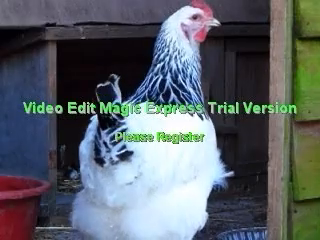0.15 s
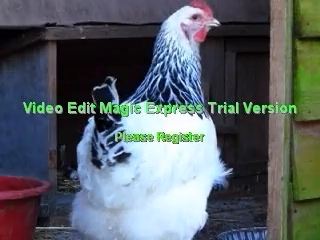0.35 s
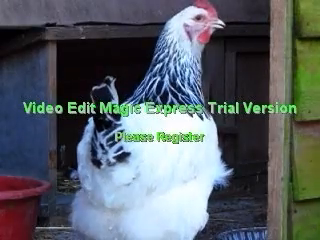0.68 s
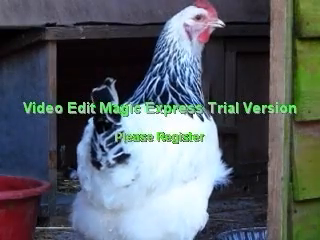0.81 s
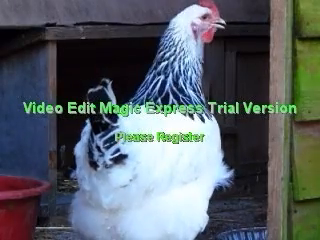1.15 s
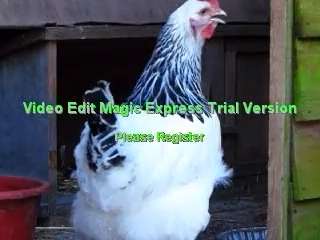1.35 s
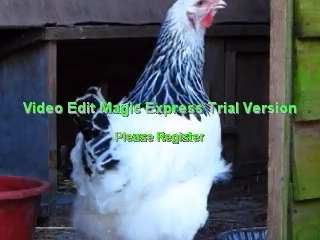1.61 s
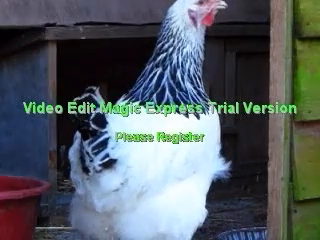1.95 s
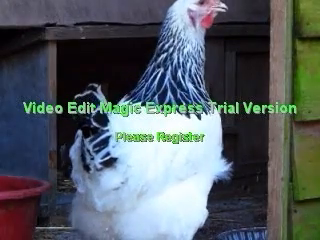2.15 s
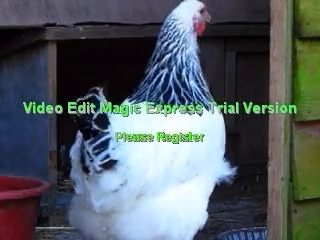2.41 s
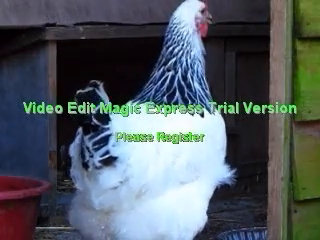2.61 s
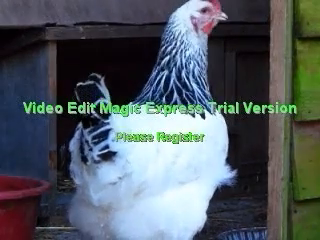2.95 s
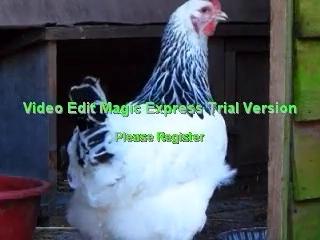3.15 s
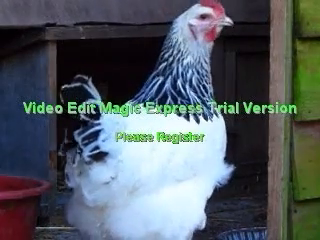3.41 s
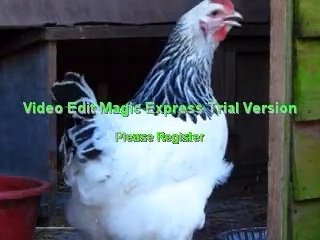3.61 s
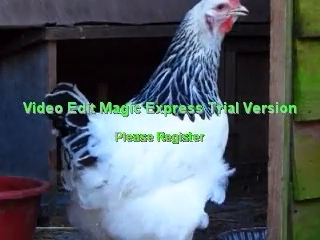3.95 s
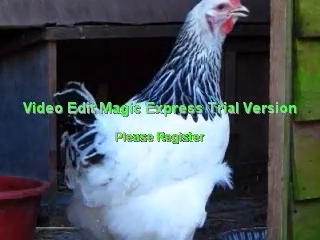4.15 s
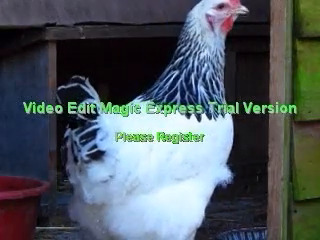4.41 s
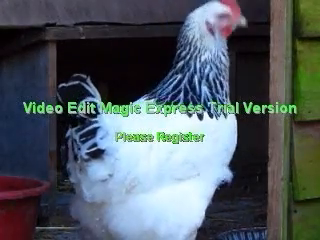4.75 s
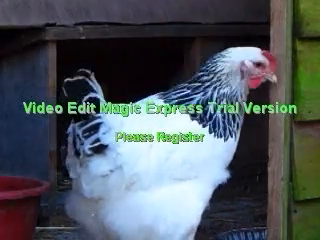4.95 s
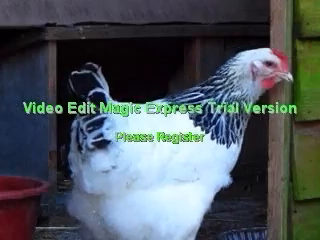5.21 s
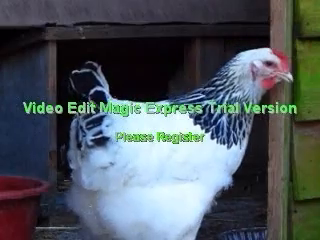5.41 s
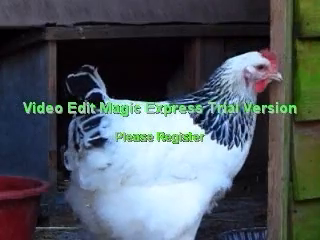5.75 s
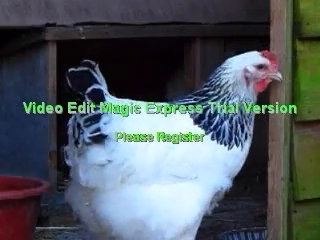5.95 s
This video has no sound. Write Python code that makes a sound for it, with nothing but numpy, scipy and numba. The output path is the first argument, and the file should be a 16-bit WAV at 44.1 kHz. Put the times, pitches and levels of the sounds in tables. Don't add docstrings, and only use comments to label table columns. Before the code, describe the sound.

One hen about a metre away beside a wooden coop gives short, hoarse clucks, four or five a second, growing louder until a long, bright, nasal squawk. After a brief gap she starts softly again, builds to a second squawk that turns rough at its end, then begins a third run. Faint board reflections, wind bumps and low garden hum surround her; the small cheap microphone sounds coarse, narrow and hissy.

```python
import sys
import numpy as np
from scipy import signal
from scipy.io import wavfile
from scipy.ndimage import uniform_filter1d, minimum_filter1d
from numba import njit

SR = 44100
rng = np.random.default_rng(int(sys.argv[2]) if len(sys.argv) > 2 else 0)


def master(y):
    cut = np.clip(np.atleast_2d(y).T, -1, 1)
    pcm = np.round(cut * 32767)
    wavfile.write(sys.argv[1], SR, pcm.astype(np.int16))


def amplitude_ratio(level_db):
    exponent = np.asarray(level_db, float) / 20
    return 10 ** exponent


N = 267687


def level(x, db):
    return x * amplitude_ratio(db) / np.sqrt(np.mean(x ** 2))


@njit
def svf(x, hz, width):
    y, band, low = np.empty(len(x)), 0., 0.
    for i in range(len(x)):
        g, k = np.tan(np.pi * hz[i] / SR), width / hz[i]
        v = (band + g * (x[i] - low)) / (1 + g * (g + k))
        band, low, y[i] = 2 * v - band, low + 2 * g * v, k * v
    return y


def ring(x, hz, width_hz):
    hz = hz * np.ones(N)
    for _ in range(3):
        x = svf(x, hz, 1. * width_hz)
    return x


def walk(rate):
    k = int(SR / rate)
    held = np.repeat(rng.standard_normal(N // k + 1), k)
    return 1.3 * uniform_filter1d(uniform_filter1d(held, k), k)[:N]


# f/Hz, spectral level/dB per Hz
HUM_SPECTRUM = [(24, -31), (40, -3.5), (70, -28), (145, -18.5), (560, -31), (693, -15.5), (793, -26),
                (1260, -28), (1410, -36), (1560, -21.5), (1890, -35.5), (3430, -23.5), (4000, -26.5),
                (5200, -58), (8800, -120)]
# t/s, level/dB
BREEZE_LEVEL = [(0, -48.5), (1.06, -43), (1.3, -49.5), (1.45, -59.5), (2.1, -50), (3.03, -47), (3.5, -42.5),
                (3.9, -50.5), (4.5, -56), (5.07, -52.5), (5.4, -44.5), (6.07, -45.5)]


def garden():
    hum, swell = 0, walk(0.31)
    hzs, dbs = np.transpose(HUM_SPECTRUM)
    for hz in 50 * 2 ** np.arange(0, 6.5, .5):
        density_db = np.interp(np.log(hz), np.log(hzs), dbs)
        db = density_db + 10 * np.log10(hz) + 1.7 * swell + 0.5 * walk(6.7)
        hum = hum + amplitude_ratio(db) * level(svf(rng.standard_normal(N), hz * np.ones(N), hz / 3), 0)
    breeze_db = np.interp(np.arange(N) / SR, *np.transpose(BREEZE_LEVEL)) + 1.8 * walk(25)
    breeze = level(ring(rng.standard_normal(N), 210, 360), 0)
    return level(hum, -51) + amplitude_ratio(breeze_db - 2) * breeze


def controls(calls, size):
    t = np.arange(N) / SR
    s, *columns = np.transpose(sorted(row for call in calls for row in call))
    gate = sum((t >= call[0][0]) & (t <= call[-1][0]) for call in calls) > 0
    return [np.interp(t, s, c) for c in columns], uniform_filter1d(1. * gate, size=size)


@njit
def beat(hz, rough, weak, chance, jitter, shimmer):
    pulses, p, k = np.zeros(len(hz) + 1), 0., 0
    for i in range(len(hz)):
        step = hz[i] * (1 + jitter * rough[i] * chance[k, 0]) / SR
        p += step
        if p >= 1:
            p, k = p - 1, k + 1
            size = (1 - weak[i] * (k % 2)) * np.exp(shimmer * rough[i] * chance[k, 1])
            pulses[i] += size * p / step
            pulses[i + 1] += size * (1 - p / step)
    return pulses[:-1]


def even(x):
    return x / np.sqrt(uniform_filter1d(x ** 2, size=700) + 1e-9)


def cluck_shape(s, db, hold_s, hz, chest_db):
    end, haste = s + hold_s, 1.2 - 9 * hold_s
    chesty_db = chest_db + 5
    lead_bright_db, rise = -6, 0.94
    tail_bright_db, sag = 4, .95
    return [(s - .025 * haste, db - 20.5, hz, chesty_db, lead_bright_db, rise),
            (s - .013 * haste, db - 15, hz, chesty_db, lead_bright_db, rise),
            (s, db, hz, chest_db, 0, 1),
            (end, db + 1.5, hz, chest_db, 0, 1),
            (end + .012, db - 8.5, hz, chest_db + 2.5, tail_bright_db / 2, 1),
            (end + .062, db - 30, hz, chesty_db, tail_bright_db, sag)]


# full voice from t/s, level/dB, hold/s, f/Hz, chest level/dB
CLUCK_EVENTS = [(.164, -22.5, 0.019, 313.7, -3), (0.447, -19.5, 0.023, 358.4, -5.5),
                (0.686, -15, .025, 360.5, -7), (.901, -12, 0.023, 363.2, -5),
                (1.112, -13, 0.024, 368.6, -5), (1.633, -27.5, 0.053, 411.8, -1),
                (1.874, -21.5, 0.019, 357.4, -7), (2.142, -21, .01, 337.7, -5.5),
                (2.386, -16.5, .01, 355.6, -15), (2.629, -15.5, 0.016, 356.5, -10),
                (2.851, -14, .023, 353.9, -8), (3.067, -13.5, .028, 361.3, -8.5),
                (3.277, -15.5, 0.039, 360.2, -6.5), (3.489, -16, .033, 361.2, -8),
                (4.097, -26, .036, 384.8, -6.5), (4.493, -22, 0.017, 334.7, -9),
                (4.767, -24.5, 0.023, 317.9, -12.5), (5.074, -16, 0.019, 342.4, -13.5),
                (5.305, -18, .031, 337.4, -4), (5.542, -15, 0.018, 339.8, -8),
                (5.795, -14.5, 0.021, 365.7, -14), (6.026, -14.5, 0.031, 375.2, -9)]
VOICE_QUALITY = [(0, .55, .55), (.6, .7, .3), (1.2, .4, .75), (1.6, .5, .45), (2.1, .3, .3), (2.3, .5, .4),
                 (3.0, .65, .35), (3.58, .4, .75), (4.05, .45, .5), (4.4, .25, .3), (5.25, .5, .45)]
# t/s, f/Hz, brightness/dB, throat tuning ratio
BEAK_GAPE = [(.17, 3366, 1, 0.98), (.9, 3287, 0.5, 1.008), (1.13, 3226, 3, .99), (1.66, 3500, 0.5, 1.018),
             (2.15, 3557, -1.5, .99), (2.4, 3354, -3, 0.98), (2.86, 3167, -1.5, 1.01), (3.3, 3288, 1, 1),
             (3.5, 3130, 4, 0.98), (3.88, 3650, -1, 1.017), (4.12, 3560, -1.5, 0.99),
             (4.5, 3145, -3.5, 0.99), (4.78, 3566, -4.5, 1.07), (5.09, 3540, -1.5, 1.04),
             (5.32, 3442, 5, 1.013), (5.56, 3390, 1, 1.01), (5.81, 3530, -2.5, 1.05),
             (6.04, 3504, 0.5, 1.053)]
# f/Hz, width/Hz, level/dB
CHEST_MODES = [(304, 300, -10.5), (719.7, 160, -6), (903.6, 300, 10)]
THROAT_MODES = [(1027.8, 340, 5), (1372, 240, -16.5)]
BESIDE_BEAK_MODES = [(2789, 280, -9), (3960, 490, -11.5)]
# t/s from the edge, level/dB; then f/Hz, chest level/dB, brightness/dB
CRACK_IN, CRACK_IN_VOICE = [(-.013, -33.5), (-.007, -28.5), (.009, -31)], (400, -8, 17)
CRACK_OUT, CRACK_OUT_VOICE = [(.002, -36), (.017, -28), (.085, -50)], (367, -2.7, 16)


def clucks():
    calls = [cluck_shape(*row) for row in CLUCK_EVENTS]
    for call in SQUAWK_CALLS:
        for edge, shape, voice in ((call[0][0], CRACK_IN, CRACK_IN_VOICE), (call[-1][0], CRACK_OUT, CRACK_OUT_VOICE)):
            calls.append([(edge + s, db, *voice, 1) for s, db in shape])
    (db, pitch_hz, chest_db, air_db, arch), gate = controls(calls, size=300)
    (beak_hz, gape_db, tuning), _ = controls([BEAK_GAPE], size=1)
    middle_db = -18.5 + air_db + 0.77 * gape_db
    beak_db = -18.5 + air_db + gape_db

    s, *quality = np.transpose(VOICE_QUALITY)
    now = np.searchsorted(s, np.arange(N) / SR, side="right") - 1
    weak, rough = (q[now] for q in quality)
    chance = np.clip(rng.standard_normal((4000, 2)), -2, 2)
    pulses = level(beat(pitch_hz * arch, rough, weak, chance, .12, .7), 0)
    breath = rough * rng.standard_normal(N)

    low = pulses + 1.4 * breath
    high = pulses + 4. * breath
    shift = arch ** 1.5 * tuning
    chest = even(sum(amplitude_ratio(g) * ring(low, hz * shift, w) for hz, w, g in CHEST_MODES))
    throat = even(sum(amplitude_ratio(g) * ring(low, hz * shift, w) for hz, w, g in THROAT_MODES))
    middle = even(ring(pulses + 2.7 * breath, 1920, 330))
    beside = sum(amplitude_ratio(g) * ring(high, hz, w) for hz, w, g in BESIDE_BEAK_MODES)
    beak = even(ring(high, beak_hz, 380) + beside)

    body = np.sqrt(1 - np.minimum(amplitude_ratio(chest_db), .95) ** 2) * throat + amplitude_ratio(chest_db) * chest
    voice = body + amplitude_ratio(middle_db) * middle + amplitude_ratio(beak_db) * beak
    depth = 0.7 * (air_db < 8) * np.clip((3446 - beak_hz) / 120, 0, 1)
    dip = depth * svf(voice, 1499 * np.ones(N), 320.)
    return gate * amplitude_ratio(db) * (voice - dip)


@njit
def walls(x, lags, gain, damp):
    line, soft, out = np.zeros((8, 4096)), np.zeros(8), np.zeros(len(x))
    for i in range(len(x)):
        total = 0.
        for k in range(8):
            soft[k] += (1 - damp) * (gain[k] * line[k, (i - lags[k]) & 4095] - soft[k])
            total += soft[k]
        out[i] = soft[::2].sum() - soft[1::2].sum()
        for k in range(8):
            line[k, i & 4095] = x[i] + soft[k] - total / 4
    return out


def coop(hen):
    slap_s, slap_db, t60_s, damp, tail_db = .021, -15, .38, .12, -22
    lag = int(slap_s * SR)
    near = hen.copy()
    near[lag:] += amplitude_ratio(slap_db) * hen[:-lag]
    lags = np.array([613, 907, 1213, 1531, 1871, 2251, 2659, 3109])
    tail = walls(near + 1e-18, lags, amplitude_ratio(-60 * lags / SR / t60_s), damp)
    return near + amplitude_ratio(tail_db) * tail


# t/s, peak level/dB, f/Hz
WIND_POPS = [(0.672, -27, 306), (0.893, -25.5, 286), (0.955, -39.5, 225), (1.095, -25, 306),
             (3.077, -27, 175), (3.147, -44, 127), (3.27, -31.5, 115.7), (3.291, -19.5, 187.4),
             (3.315, -16, 156.4), (3.466, -36, 120), (3.601, -35, 253), (3.632, -40, 145.5),
             (3.688, -38, 111.3), (3.706, -27, 112), (3.861, -28.5, 130), (3.98, -29.5, 160.6),
             (4.005, -25.5, 193), (4.024, -26.5, 207.6), (4.183, -39, 132), (5.343, -30, 262),
             (5.771, -40.5, 191), (5.931, -27, 240.5)]


def pops():
    out, t = np.zeros(N + 2000), np.arange(2000) / SR
    for s, db, hz in WIND_POPS:
        i = int(s * SR)
        out[i:i + 2000] += amplitude_ratio(db) * np.sin(2 * np.pi * hz * t) * np.exp(-(t * hz / 1.3) ** 2)
    return out[:N]


# t/s, f/Hz, level/dB, brightness/dB, ring of fourth and seventh harmonic/dB
SQUAWK_CALLS = [
    [(1.228, 533.5, -11, -4, -2), (1.25, 528.3, -11.5, 0.5, -6.5), (1.29, 520.8, -12.5, 4, 0),
     (1.35, 529.8, -12, 2.5, -0.5), (1.375, 535.3, -12.5, -11.5, -13.5), (1.43, 538.8, -12, -10, -7),
     (1.457, 557, -14, -13.5, -9)],
    [(3.606, 526.4, -13.5, -2, -1.5), (3.626, 518.4, -11.5, -4.5, -7), (3.7, 517, -13, -1.5, -4),
     (3.74, 529.3, -14.5, -11, 0), (3.762, 531.9, -11, -11, 3), (3.79, 533.5, -10.5, -16.5, -9),
     (3.815, 544.3, -13.5, -26, -18), (3.84, 544.4, -16, -19.5, -7.5), (3.86, 552.3, -11, -20.5, -13.5)],
]
# t/s from the edge, pitch ratio, level/dB, brightness/dB
LOCKING_IN = [(-.013, 1.09, -30.5, 9), (-.0075, 1.33, -7, 4), (-.004, 1.015, -1.5, 5.5)]
# t/s from the edge, pitch ratio, level/dB, brightness/dB
BREAKING_OFF = [(.009, 0.96, -2, 4), (.018, .9, -1.6, -2), (.023, .87, -18.5, -7.5)]
# multiple of the pitch, level/dB
UPPER_PARTIALS = [(4, 4), (6, -4), (7, -14)]
BEAK_PARTIALS = [(5, -1.5)]
HALF_PARTIALS = [(.5, -14.5), (1.5, -17.5), (2.5, -5), (3.5, -1.5), (4.5, -10.5), (5.5, -17.5), (6.5, -8.5)]


def squawk_edge(row, shape):
    s, hz, db, bright_db, ring_db = row
    return [(s + ds, hz * ratio, db + rel_db, bright_db + air, ring_db + air) for ds, ratio, rel_db, air in shape]


def squawks():
    t = np.arange(N) / SR
    calls = [squawk_edge(c[0], LOCKING_IN) + c + squawk_edge(c[-1], BREAKING_OFF) for c in SQUAWK_CALLS]
    (hz, db, bright_db, ring_db), gate = controls(calls, size=60)
    upper_db, beak_db = -19 + ring_db, -17 + bright_db
    half_db = -37.5 + np.interp(t, (3.765, 3.805), (0, 20.5))
    low_db = db - 25
    for call, lag_s, start_db in zip(SQUAWK_CALLS, (0.018, .14), (-26, -14.5)):
        low_db = low_db + start_db * np.exp(-((t - call[0][0]) / lag_s) ** 4)
    phase = 2 * np.pi * np.cumsum(hz * (1 + 0.0023 * walk(150))) / SR

    def stack(rows):
        total = 0
        for k, g in rows:
            start = 2 * np.pi * rng.random()
            total = total + amplitude_ratio(g + 2.0 * walk(60)) * np.sin(round(2 * k) / 2 * phase + start)
        return total

    beak_rasp = level(ring(rng.standard_normal(N), 6.3 * hz, 1500), -24)
    rasp = level(ring(rng.standard_normal(N), 2 * hz, 1100), -32)
    main = np.sin(2 * phase) + stack([(3, -25)]) + rasp
    upper = amplitude_ratio(upper_db) * stack(UPPER_PARTIALS)
    beak = amplitude_ratio(beak_db) * (stack(BEAK_PARTIALS) + beak_rasp)
    halves = amplitude_ratio(half_db) * stack(HALF_PARTIALS)
    voice = amplitude_ratio(db) * (main + upper + beak + halves) + amplitude_ratio(low_db) * np.sin(phase)
    return np.sqrt(2) * gate * voice


def drone():
    centre_s, length_s = 2.2, .45
    swell = np.exp(-((np.arange(N) / SR - centre_s) / length_s) ** 2)
    return swell * level(ring(rng.standard_normal(N), 138.4, 40), -54)


def scene():
    hen = clucks() + squawks()
    return (coop(hen) + pops() + garden() + drone())[None]


def roll_off(x):
    return signal.sosfilt(signal.butter(12, 15710, fs=SR, output="sos"), x)


def record(dry):
    ceiling, steps, offset_steps, rounding = .43, 128, -3.72, .04
    peak = uniform_filter1d(-minimum_filter1d(-np.abs(dry[0]), size=400), size=200)
    soft = dry[0] * np.minimum(1, ceiling / peak)
    stored = np.round(signal.resample_poly(soft, 80, 441) * steps + offset_steps)
    smooth = signal.resample_poly(stored, 441, 160, padtype="mean")
    held = np.repeat(np.floor(smooth + rounding) / steps, 2)[None, :N]
    low_pass = signal.ellip(12, .1, 85, 15720, fs=SR, output="sos")
    held = signal.sosfilt(low_pass, held)
    return roll_off(held)


dry = scene()
out = record(dry)
master(out)
```